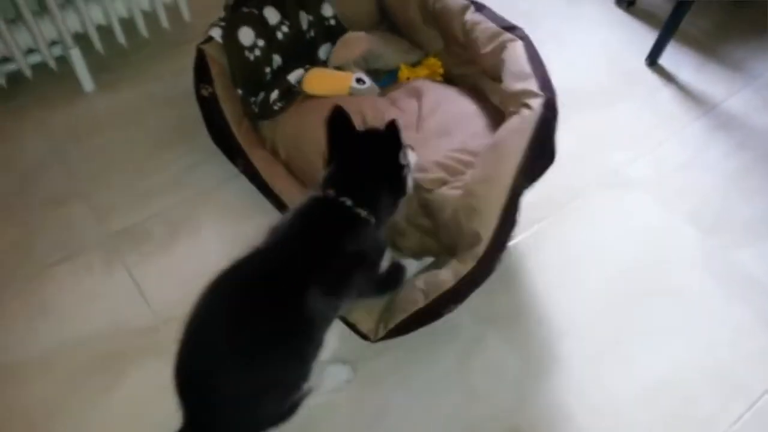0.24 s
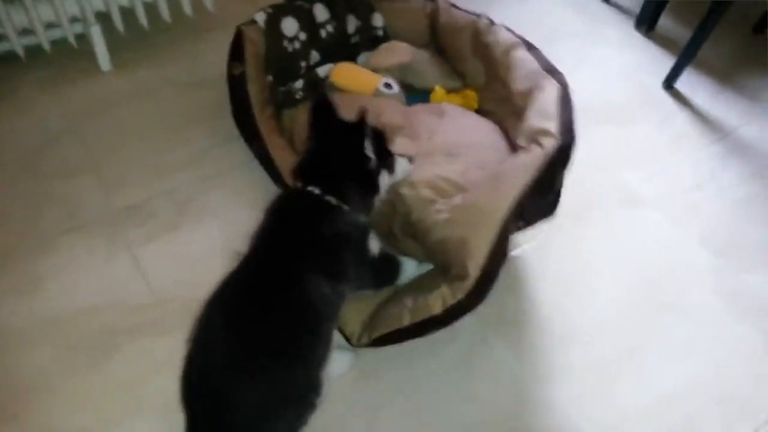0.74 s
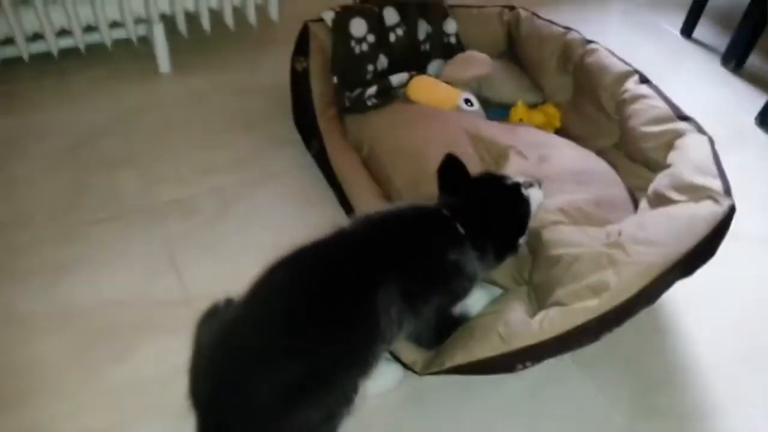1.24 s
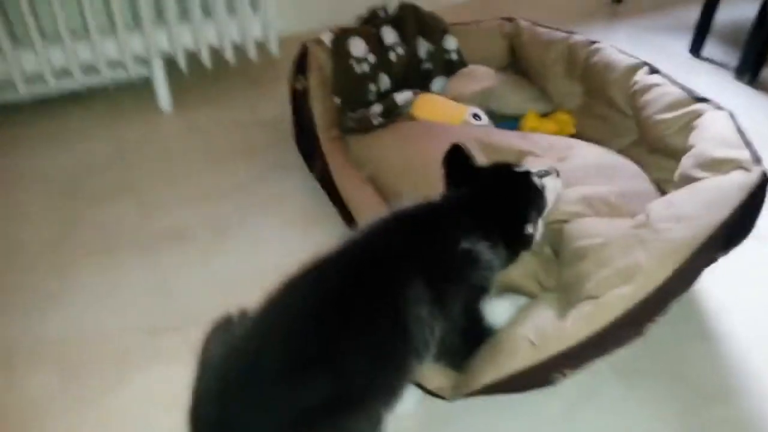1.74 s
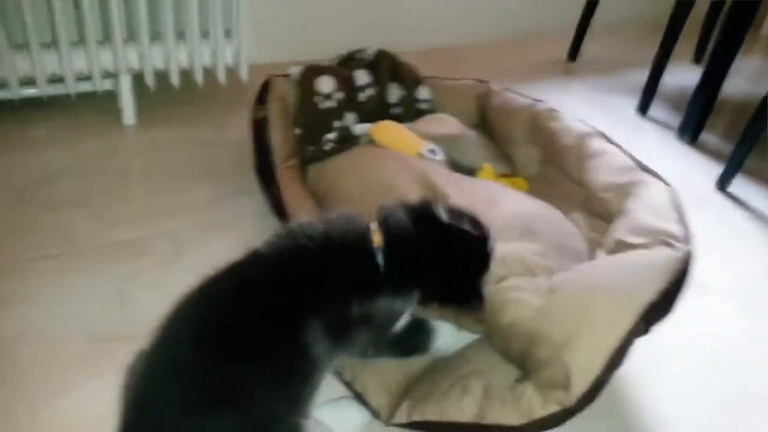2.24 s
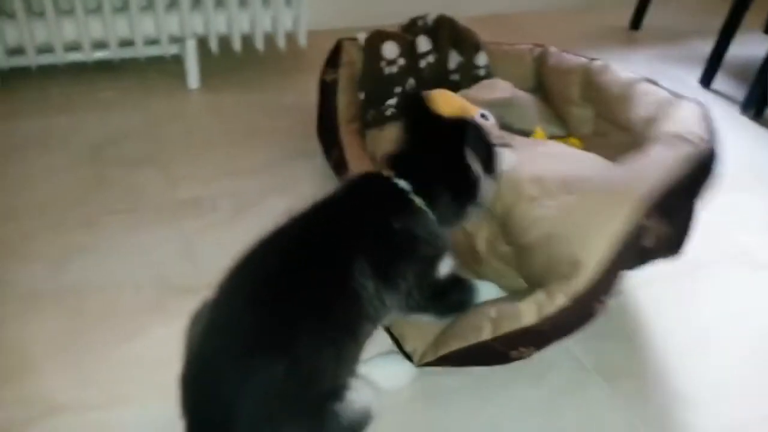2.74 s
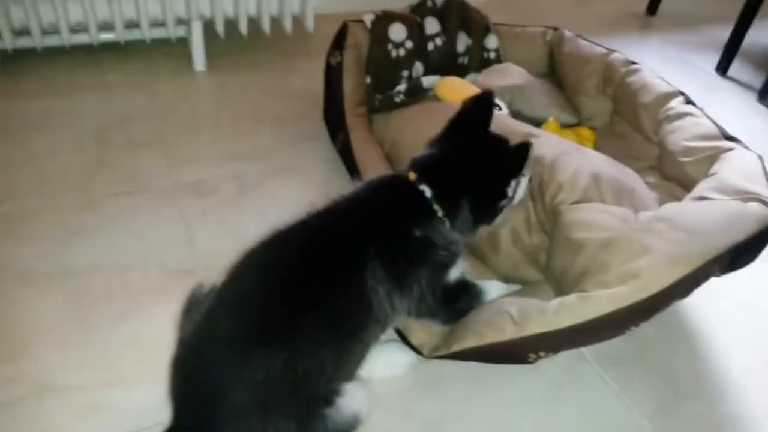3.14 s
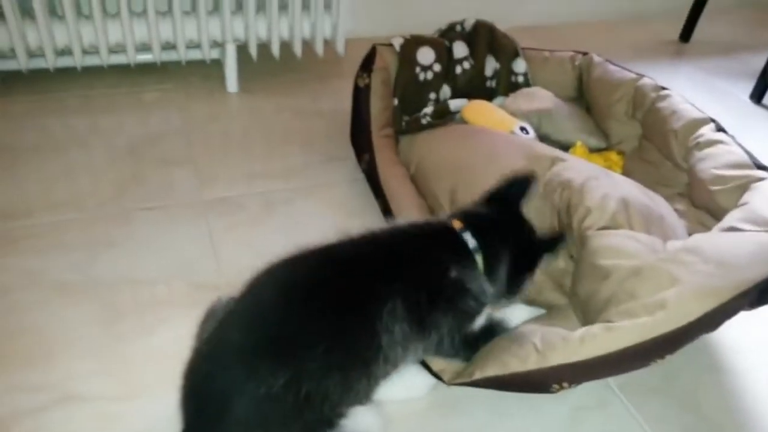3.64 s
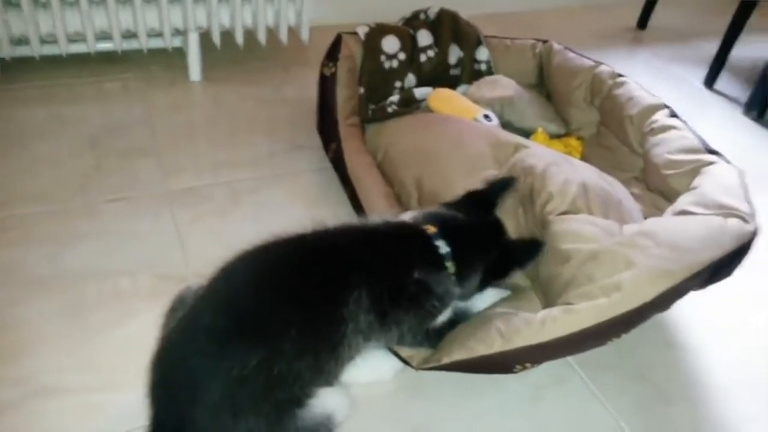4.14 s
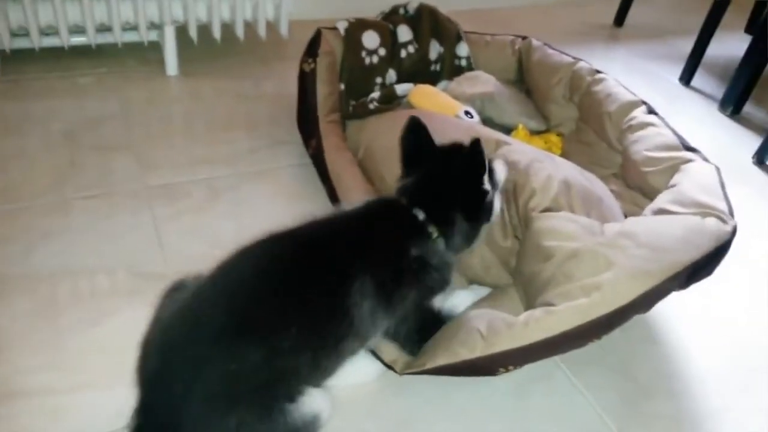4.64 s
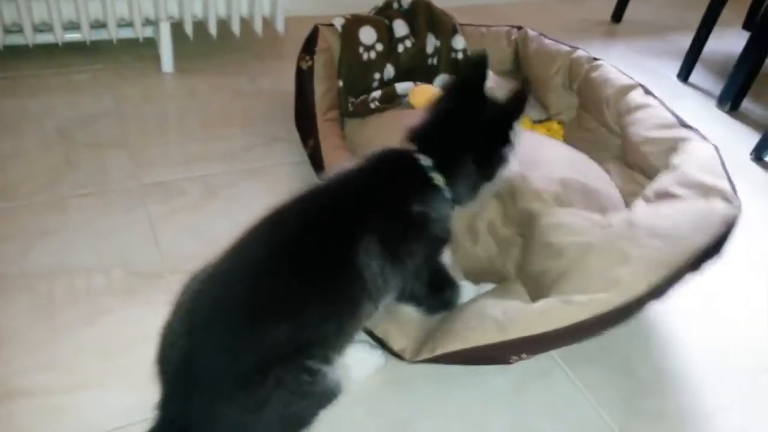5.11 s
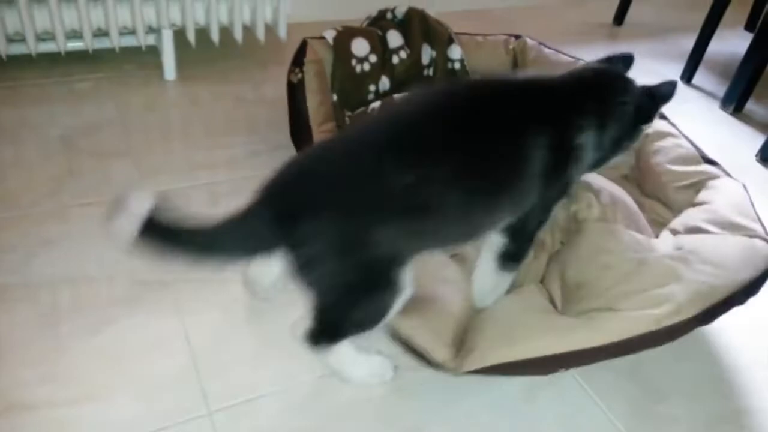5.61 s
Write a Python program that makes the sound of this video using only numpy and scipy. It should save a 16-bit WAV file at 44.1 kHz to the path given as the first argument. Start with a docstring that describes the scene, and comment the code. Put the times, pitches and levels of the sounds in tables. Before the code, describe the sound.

Irregular digging on a cushioned pet bed: dry fabric swishes, muffled padding rustle, low scratchy claw drags and light knocks on tile. Activity is almost continuous for three seconds, peaks in a heavy thud and slap, drops to faint scrapes, then picks up again with a strong final cloth sweep. Lively indoor reverberation, a bright slightly coloured phone stereo sound and very low background noise.

```python
"""Cloth swishes in countless tiny slips as a puppy tugs and digs at a padded fabric bed in a ringing room.
Cover: random slip impulses, coloured as hiss and padding rustle, swell with each pull and jolt.
Claws rasp as filtered stick-slip plucks; rim and paws knock as filtered thuds and slaps on a hard floor.
Folds tick as short band-passed clicks, the heaviest blow sets off a decaying low sine,
and faint coloured noise is the room tone. A phone's two ports hear it all, each with its own colour."""
import sys
import numpy as np
from scipy import signal
from scipy.fft import rfft, irfft, next_fast_len
from scipy.io import wavfile

SR = 44100
rng = np.random.default_rng(int(sys.argv[2]) if len(sys.argv) > 2 else 0)


def to_wav(sig):
    """Store sig (one row per channel, or 1-D mono) as 16-bit WAV at the path in sys.argv[1].

    Samples outside -1..1 are clipped; the rate is SR.
    """
    pcm = np.clip(np.atleast_2d(sig), -1, 1) * 32767
    pcm = np.round(pcm).astype(np.int16)
    wavfile.write(sys.argv[1], SR, pcm.T)  # frames by channels


N = 258862
TIME = np.arange(N) / SR

# tugs and shoves sliding the cloth: [start t/s, length/s, level/dB before level_db, padding/dB re hiss]
PULLS = [(-.1, 0.13, -49, 4), (0.034, 0.17, -57.5, -1.5), (0.274, 0.33, -53, -4.5),
         (0.477, 0.29, -48, -2.5), (0.598, 0.23, -48, -5), (0.795, 0.22, -56, -2.5),
         (0.956, 0.2, -42, -15.5), (1.073, 0.26, -51.5, -3), (1.243, 0.13, -45.5, -5),
         (1.354, 0.16, -59.5, -4), (1.5, 0.32, -54.5, -2), (1.72, 0.36, -53, -1),
         (1.942, 0.55, -48.5, -4.5), (2.28, 0.44, -51.5, -3.5), (2.58, 0.22, -52, -1),
         (2.737, 0.43, -55, -2), (3.108, .24, -66, -14), (3.38, 0.47, -78.5, -3), (3.623, 0.35, -70, -2.5),
         (3.738, 0.19, -65, 11), (3.845, 0.31, -66, 10), (4.184, 0.21, -70, 1), (4.673, 0.2, -68, -4),
         (4.758, 0.2, -56, -2.5), (4.91, 0.19, -49, -7), (5.08, 0.33, -53, -1.5), (5.17, 0.36, -46, -6.5),
         (5.436, 0.45, -51.5, -3), (5.747, 0.37, -40.5, -7)]
# spectrum of threads slipping: [f/Hz, level/dB]
HISS_SPECTRUM = [(200, -32), (1200, -12), (2200, -1.5), (3200, -0.5), (5000, 2), (7500, 3.5), (10000, 0.5),
                 (14000, -9.5)]
# spectrum of rustling padding: [f/Hz, level/dB]
PADDING_SPECTRUM = [(30, -22), (57, -6.5), (85, -9), (130, -3.5), (200, -0.5), (400, -1), (900, 0),
                    (1800, -0.5), (3000, -10), (6000, -15.5), (14000, -38.5)]
PULL_CREST, PULL_SHARPNESS = 0.55, 0.68  # share of a pull spent speeding up; swell exponent
JOLT_RE_SLAP_DB, JOLT_DECAY_S = -29.5, 0.085  # hiss before level_db, re slap peak; time to fall to 1/e
SKIM_BELOW_DB, SKIM_HIGHPASS_HZ = -14, 2770  # with less padding than this the cloth only skims


def cover_moves(jolt_padding_db):
    """Envelope and padding dB of each move: pulls swell and ease off, jolts start at once and die away."""
    moves = []
    for start_s, length_s, db, padding_db in PULLS:
        pull = undb(db) * swell(start_s, length_s, PULL_CREST, PULL_SHARPNESS)
        moves.append((pull, padding_db))
    for start_s, _, slap_db, _, _ in KNOCKS:
        decay = (TIME >= start_s) * np.exp(-np.abs(TIME - start_s) / JOLT_DECAY_S)
        moves.append((undb(slap_db + JOLT_RE_SLAP_DB) * decay, jolt_padding_db))
    return moves


def cover(level_db=-5.5, jolt_padding_db=-2, catch_db=1.32, direct_db=-9, patches=4):
    """Threads slip over each other and hiss; under weight the padding rustles too."""
    moves = cover_moves(jolt_padding_db)
    # overlapping moves add in power
    sliding = np.sqrt(sum(move ** 2 for move, db in moves if db >= SKIM_BELOW_DB))
    skimming = np.sqrt(sum(move ** 2 for move, db in moves if db < SKIM_BELOW_DB))
    pressed = np.sqrt(sum((undb(db) * move) ** 2 for move, db in moves))
    grip = undb(level_db + catch_db * walk(rate_hz=70))  # the cloth catches as it goes
    out = 0
    for _ in range(patches):
        hiss = unit_rms(colour(slips(rate_hz=3000, spread_db=6.0), HISS_SPECTRUM))
        padding = unit_rms(colour(slips(rate_hz=700, spread_db=4.5), PADDING_SPECTRUM))
        thin_hiss = pole(hiss, SKIM_HIGHPASS_HZ, 1.0, "high")
        patch = grip * (sliding * hiss + skimming * thin_hiss + pressed * padding)
        # every patch of the wide bed meets the room from its own spot
        out = out + undb(direct_db) * patch + ring(patch, room(tail_db=3.5, echo_db=-1.0))
    return out / np.sqrt(patches)


def swell(start_s, length_s, crest, sharpness):
    """One movement: speed rises from rest to 1 and falls back to rest."""
    crest = np.clip(crest, .1, .9)
    ramp = np.interp(TIME, start_s + length_s * np.array([0, crest, 1]), [0, 1, 0])
    return np.sin(np.pi / 2 * ramp) ** sharpness


def slips(rate_hz, spread_db):
    """Randomly timed one-sample impulses of either sign and uneven size."""
    hits = rng.random(N) < rate_hz / SR
    signs = rng.choice([-1, 1], N)
    return hits * signs * undb(spread_db * rng.standard_normal(N))


def walk(rate_hz):
    """Random values joined by straight lines, with a spread near 1."""
    steps = rng.standard_normal(2048)
    return 1.2 * np.interp(TIME * rate_hz, np.arange(len(steps)), steps)


# claws dragging over taut cloth: [start t/s, length/s, level/dB before level_db, brightness f/Hz]
STROKES = [(-.05, 0.1, -51.5, 487), (0.341, 0.056, -54, 403), (0.607, .18, -48, 550),
           (1.09, 0.36, -58.5, 290), (1.638, 0.065, -56.5, 540), (1.694, 0.19, -66, 290),
           (2.068, 0.045, -48.5, 547), (2.09, 0.12, -55, 343), (2.244, .14, -51, 393),
           (3.765, .13, -55, 690), (3.866, .32, -44.5, 548), (4.846, 0.069, -56.5, 496),
           (4.897, 0.13, -49.5, 346)]
STROKE_CREST, STROKE_SHARPNESS = 0.44, 0.83  # as for a pull


def claw_voice(hz, body, muffle_hz):
    """Slips pluck the cloth; filters leave a unit-rms rasp around hz."""
    plucks = pole(slips(rate_hz=450, spread_db=3), body * hz, 0.99, "high")
    plucks = pole(plucks, 160, 0.96, "high")
    rasp = pole(plucks, hz, 1.0, "low")
    return unit_rms(pole(rasp, muffle_hz, .45, "low"))


def claws(level_db=-4, body=0.56, muffle_hz=1100, slack_hz=320, taut_hz=620):
    """Claws stick and slip on the weave; each slip plucks the taut, padded cloth."""
    slack = claw_voice(slack_hz, body, muffle_hz)
    taut = claw_voice(taut_hz, body, muffle_hz)
    out = np.zeros(N)
    for start_s, length_s, db, hz in STROKES:
        # tighter cloth sounds brighter: blend the slack and the taut voice
        tension = np.clip(np.log(hz / slack_hz) / np.log(taut_hz / slack_hz), 0, 1)
        drag = undb(level_db + db) * swell(start_s, length_s, STROKE_CREST, STROKE_SHARPNESS)
        out += drag * (np.sqrt(1 - tension) * slack + np.sqrt(tension) * taut)
    return out + ring(out, room(tail_db=-0.5, echo_db=1))


# rim, paws and claws striking; dry peaks:
# [t/s, thud peak/dB, slap peak/dB, slap brightness f/Hz, scuff/dB re slap impulse]
KNOCKS = [(0.168, -37.5, -32.5, 2770, -27), (0.1908, -37, -16, 2100, -28.5),
          (0.6018, -33.5, -33.5, 2400, -29), (.6066, -50, -27, 1800, -23), (.665, -40, -31, 2000, -21),
          (.684, -46, -35.5, 1400, -28.5), (2.645, -38.5, -44.5, 827, -16), (2.653, -31.5, -48.5, 790, -27),
          (2.668, -32.5, -62, 797, -27), (2.699, -35.5, -60, 697, -18), (3.001, -23.5, -17.5, 2130, -24),
          (3.013, -31, -23, 750, -27), (3.024, -36.5, -26.5, 1500, -22.5), (3.047, -28.5, -32, 910, -20),
          (3.237, -36, -39, 1930, -27.5), (3.281, -51.5, -55, 700, -30), (4.038, -39, -48, 700, -22),
          (4.131, -44, -43, 900, -25), (4.3401, -43, -38.5, 2700, -24), (4.969, -44, -56, 682, -27),
          (5.2303, -30, -28.5, 1800, -41)]


def knocks(thud_hz=270, thud_q=0.73, thud_low_hz=155, slap_low_hz=400, scuff_s=0.013, spots=3):
    """A blow thuds in the cushion and slaps the floor, brighter as the contact is harder."""
    thuds, slaps = np.zeros((2, spots, N))
    blow = signal.unit_impulse(4096)
    thud = pole(blow, thud_hz, thud_q, "band")
    thud = pole(pole(thud, 500, 0.6, "low"), thud_low_hz, 0.77, "high")
    # the cloth scuffs on along the floor for a moment after contact
    scuffs = rng.standard_normal((len(KNOCKS), len(blow))) * np.exp(-TIME[:len(blow)] / scuff_s)
    for k, (start_s, thud_db, slap_db, hz, scuff_db) in enumerate(KNOCKS):
        contact = pole(blow, 2.2 * hz, 0.7, "low") + undb(scuff_db) * scuffs[k]
        slap = pole(pole(contact, hz, 0.61, "low"), slap_low_hz, 0.93, "high")
        add(thuds[k % spots], start_s, thud_db, thud)
        add(slaps[k % spots], start_s, slap_db, slap)
    # the padding soaks up its own thud, while the slap spreads along the bare floor
    soft = sum(x + ring(x, room(tail_db=-0.5, echo_db=-4.0)) for x in thuds)
    hard = sum(x + ring(x, room(tail_db=2.0, echo_db=-4.0)) for x in slaps)
    return soft + hard


# folds and seams snapping: [t/s, dry peak/dB midway between ports, band centre f/Hz, left minus right/dB]
SNAPS = [(.1672, -33, 8100, -13), (0.19, -22.5, 7440, -7), (.602, -26, 8100, 1), (1.104, -21, 2600, 7),
         (1.33, -32, 7500, 8), (3.005, -28.5, 6520, -2), (3.588, -59, 2580, 0.5), (4.13, -41, 8300, 13.5)]


def folds(q=0.62, left_lag_s=2 / SR):
    """A stiff fold buckles with a short, pitched tick, off to one side."""
    to_room, left, right = np.zeros((3, N))
    flick = signal.unit_impulse(1024)
    for start_s, db, hz, pan_db in SNAPS:
        tick = pole(pole(flick, hz, q, "band"), 0.34 * hz, 0.8, "high")
        tick = pole(pole(tick, 1.15 * hz, 1.9, "low"), 1.15 * hz, 0.9, "low")
        add(to_room, start_s, db, tick)
        add(left, start_s + left_lag_s, db + pan_db / 2, tick)
        add(right, start_s, db - pan_db / 2, tick)
    return np.array([left, right]) + ring(to_room, room(tail_db=-0.5, echo_db=-3))


def floor_boom(hz=57, t60_s=.6, re_thud_db=-32):
    """The heaviest blow (thud plus slap dB) shakes the floor into a decaying low note."""
    t = TIME[:SR]
    note = np.sin(2 * np.pi * hz * t) * np.exp(-np.log(1000) * t / t60_s)
    start_s, thud_db = max(KNOCKS, key=lambda row: row[1] + row[2])[:2]
    out = np.zeros(N)
    add(out, start_s, re_thud_db + thud_db, note)
    return out


# reverberation bands: [f/Hz, relative level/dB, t60/s]
REVERB = [(55, 3, 1), (119, -5, 0.38), (170, 5, 0.33), (240, 0, 0.5), (396, -1, 0.44), (770, -2, 0.42),
          (1340, -4, 0.44), (3000, -0.5, 0.46), (7050, -2, 0.32), (14070, -0.5, 0.39)]
# floor and furniture reflections: [nominal delay t/s, level/dB before echo_db]
ECHOES = [(.0044, -18), (.0068, -9), (.0093, -14.5), (0.0154, -17), (0.017, -13), (0.024, -20)]


def room(tail_db=2, echo_db=0, build_s=0.0011, size=32768):
    """Room response from one spot, without direct sound: first reflections and a dense tail."""
    t, hz = np.arange(size) / SR, np.fft.rfftfreq(size, 1 / SR)
    noise, tail = rfft(diffuse(size)), 0
    centres = [row[0] for row in REVERB]
    for share, (_, db, t60_s) in zip(np.eye(len(REVERB)), REVERB):
        band = irfft(noise * at(list(zip(centres, share)), hz), size)
        tail = tail + undb(db) * band * np.exp(-np.log(1000) * t / t60_s)
    built = tail * (1 - np.exp(-t / build_s))
    out = undb(tail_db) * unit_rms(built) / np.sqrt(size)
    for delay_s, db in ECHOES:
        # each reflection comes from its own side, so the ports get it at offset times
        lag = rng.integers(-9, 10)
        arrival = int(delay_s * SR * rng.uniform(.85, 1.15))
        out[[0, 1], [arrival + lag, arrival - lag]] += undb(db + echo_db)
    return out


def ring(x, response):
    """Convolve a sound with a two-channel response."""
    return signal.oaconvolve(x[None], response, axes=1)[:, :N]


def diffuse(size, spacing_m=.13):
    """Noise from all sides at two ports: alike in the bass, unrelated in the treble."""
    alike = np.sinc(2 * np.fft.rfftfreq(size, 1 / SR) * spacing_m / 343) * .97  # sound at 343 m/s
    mid, side = rfft(rng.standard_normal((2, size)))
    mid = mid * np.sqrt((1 + alike) / 2)
    side = side * np.sqrt((1 - alike) / 2)
    return irfft(np.array([mid + side, mid - side]), size)


# spectrum of the room's hush: [f/Hz, level/dB]
ROOM_TONE_SPECTRUM = [(20, -2), (55, -5.5), (90, -2.5), (200, -13.5), (500, -20), (1500, -21), (5000, -21),
                      (14000, -23)]


def room_tone(level_db=-78.5):
    """Steady diffuse noise, strongest in the bass."""
    return undb(level_db) * unit_rms(colour(diffuse(N), ROOM_TONE_SPECTRUM))


def undb(db):
    """Decibels to gain."""
    return 10 ** (np.asarray(db) / 20)


def unit_rms(x):
    """Scale to rms 1."""
    return x / np.sqrt(np.mean(x ** 2))


def at(points, hz):
    """Read (Hz, value) points on a log-frequency axis."""
    f, value = np.transpose(points)
    return np.interp(np.log(np.maximum(hz, 1)), np.log(f), value)


def colour(x, points):
    """Filter x by a gain curve of (Hz, dB) points."""
    size = next_fast_len(x.shape[-1], True)
    gain = undb(at(points, np.fft.rfftfreq(size, 1 / SR)))
    return irfft(rfft(x, size) * gain, size)[..., :x.shape[-1]]


def pole(x, hz, q, kind):
    """Two-pole low-, band- or high-pass."""
    g = np.tan(np.pi * min(hz / SR, .45))
    top = {"low": [g * g, 2 * g * g, g * g], "band": [g / q, 0, -g / q], "high": [1, -2, 1]}[kind]
    return signal.lfilter(top, [1 + g / q + g * g, 2 * (g * g - 1), 1 - g / q + g * g], x)


def add(out, start_s, peak_db, pulse):
    """Mix in a pulse at start_s, scaled to peak_db."""
    start = int(start_s * SR)
    scaled = undb(peak_db) * pulse / np.abs(pulse).max()
    out[start:start + len(pulse)] += scaled[:N - start]


def scene():
    """The bed and the puppy's paws over the hush of the room."""
    quiet = room_tone()
    return cover() + claws() + knocks() + floor_boom() + folds() + quiet


# microphone ports, left then right: [resonance f/Hz, width/Hz, added band level/dB]
PORTS = [(7310, 800, 9), (7800, 1100, 5)]
# colour difference of the ports: [f/Hz, left minus right/dB]
MIC_BALANCE = [(60, 3.5), (110, -6), (200, 0), (370, -2), (680, -0.5), (1250, -2), (2290, -4.5),
               (4200, -0.5), (7720, 2), (14200, -6)]


def record(dry, top_hz=14400):
    """Each port rings in the treble and has its own colour; the top is cut."""
    out = []
    for x, side, (hz, width_hz, db) in zip(dry, (.5, -.5), PORTS):
        x = x + undb(db) * pole(x, hz, hz / width_hz, "band")
        out.append(colour(x, [(f, side * tilt_db) for f, tilt_db in MIC_BALANCE]))
    top_cut = signal.ellip(10, .2, 70, top_hz, fs=SR, output="sos")  # ripple, stop band in dB
    return signal.sosfilt(top_cut, np.array(out))


dry = scene()
out = record(dry)
to_wav(out)
```